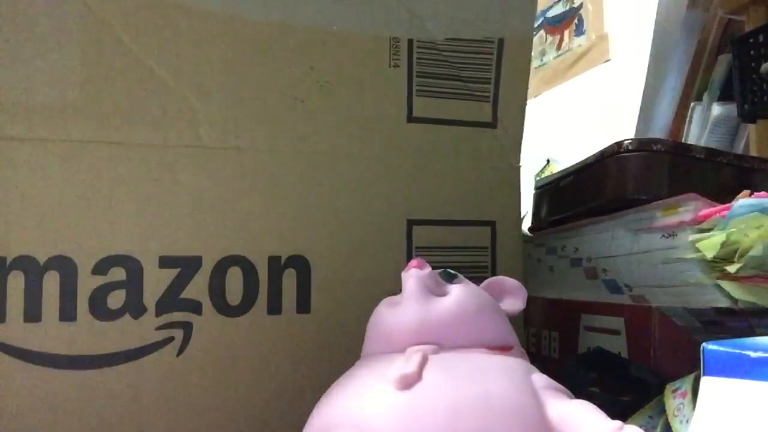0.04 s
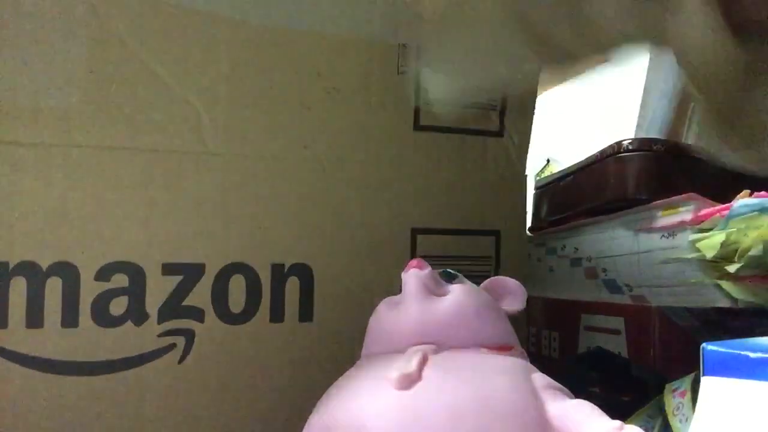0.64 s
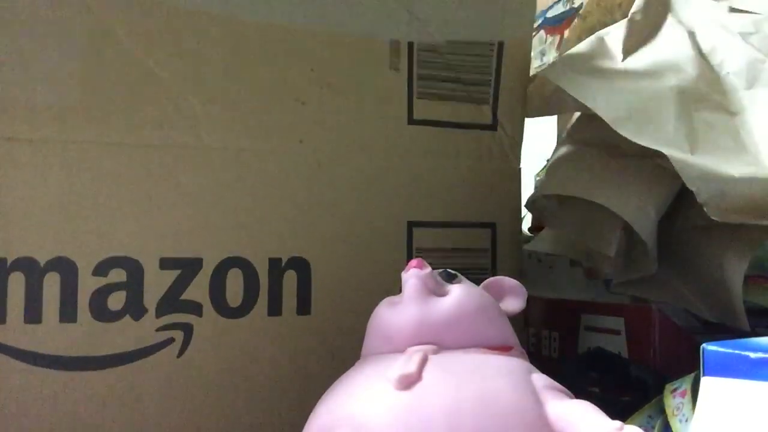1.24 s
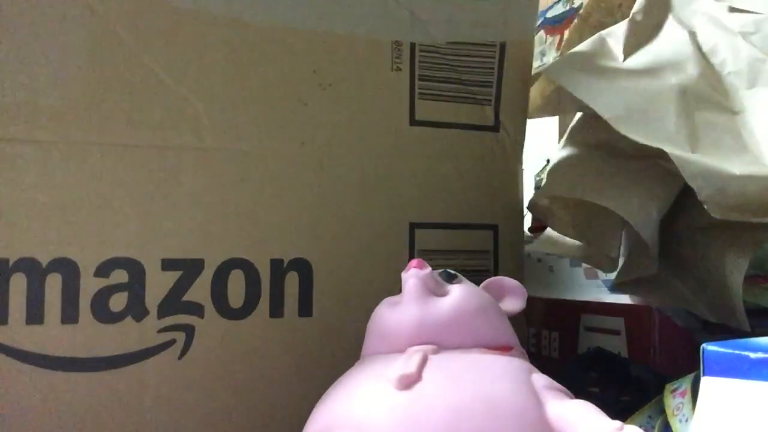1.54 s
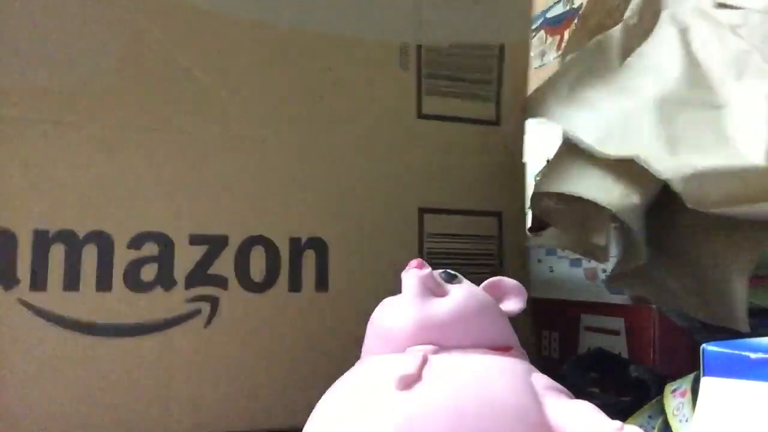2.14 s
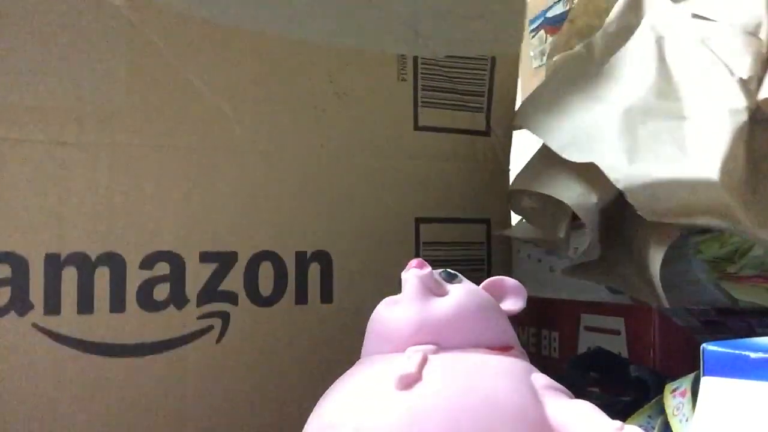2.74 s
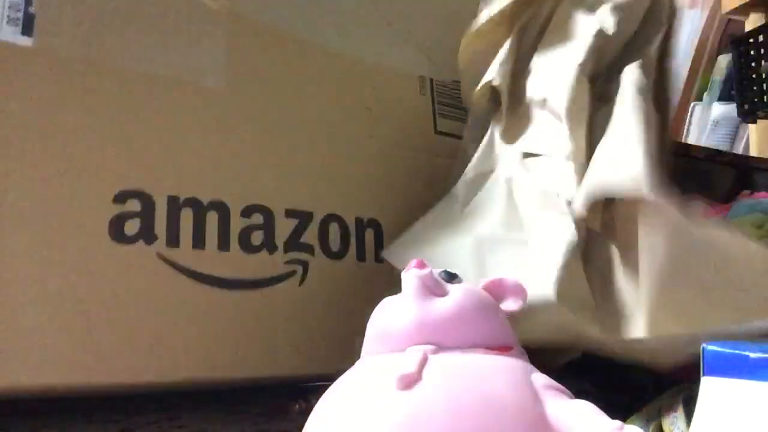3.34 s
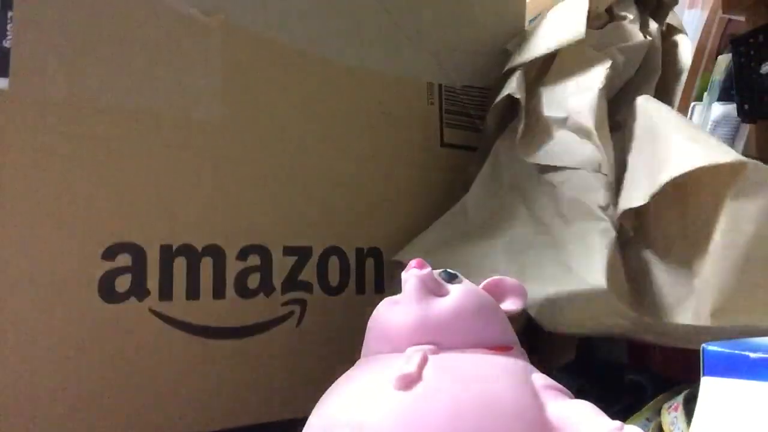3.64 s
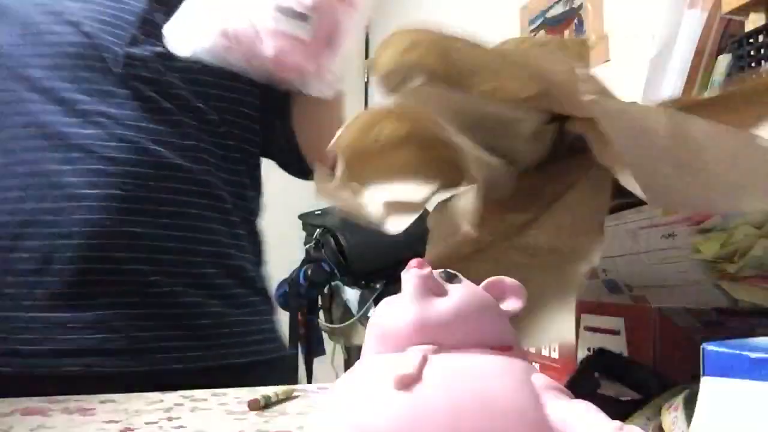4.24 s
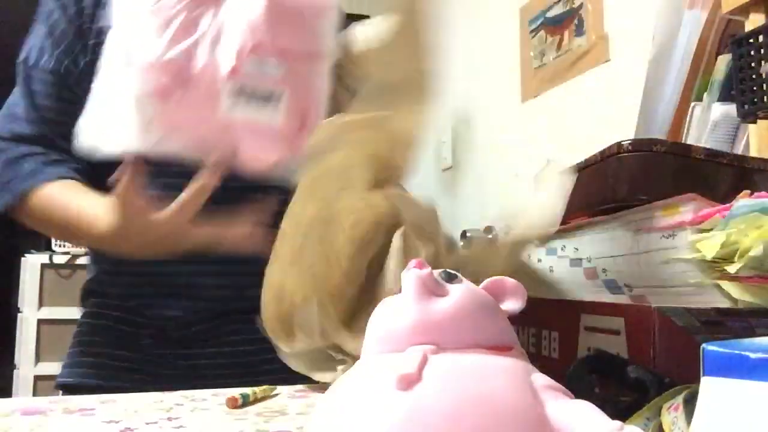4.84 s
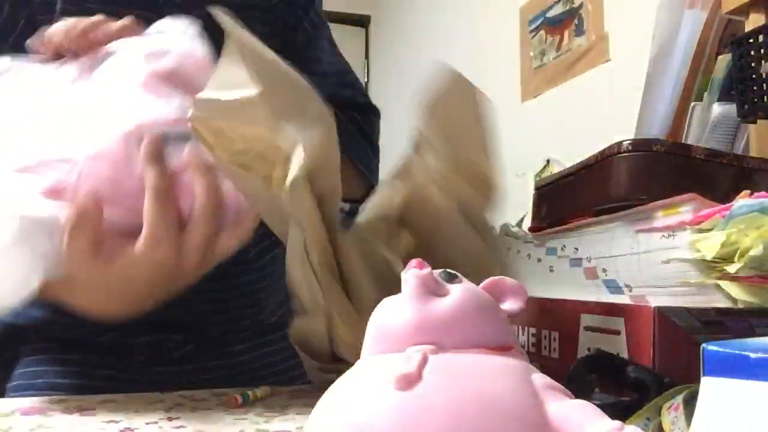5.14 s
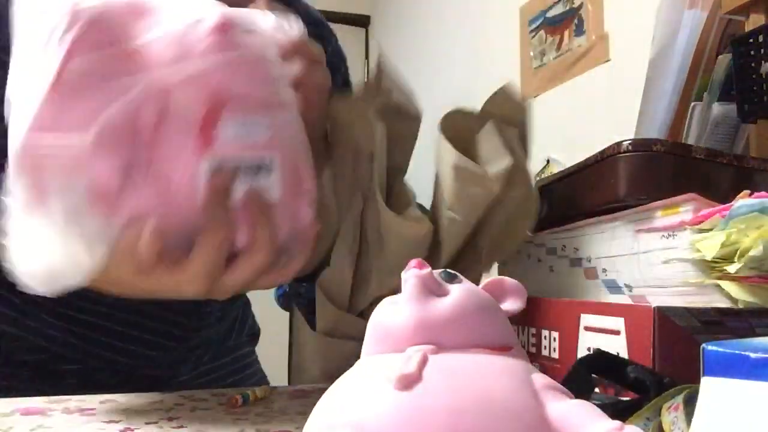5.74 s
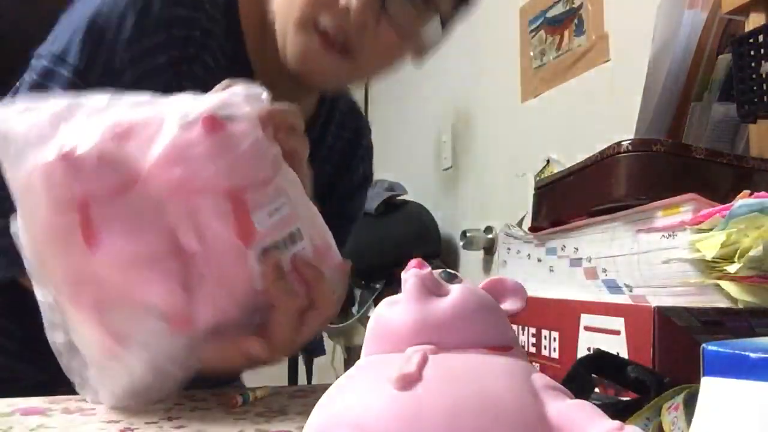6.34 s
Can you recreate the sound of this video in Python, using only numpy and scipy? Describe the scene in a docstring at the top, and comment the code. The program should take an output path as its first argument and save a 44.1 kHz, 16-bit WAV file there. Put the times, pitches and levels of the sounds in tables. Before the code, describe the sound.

Crumpled packing paper rustles close to the microphone in a small, quiet room, in uneven pulls full of bright crinkles and sharp snaps. It swells from about 0.4 to 0.9 seconds, pauses briefly, and resumes at 1.2. The cardboard box bumps hollowly as it is handled, loudest around 1.8 seconds, with lighter knocks and a few faint, very short squeaks near 2.2 to 2.5. Crackling and soft bumps continue until another loud cluster of box thuds at 3.7 and a sharp crack of its edge at 4. The rustle thins, then the paper whips taut with a loud flap at 4.7. Paper and a toy land on a desk in a quick run of dull thumps, fading by about 5.4. Dense, crisp crinkling builds from 5 to 6 seconds and eases off around 6.4, over a very faint room rumble.

```python
"""Crumpled packing paper rustles as it is dragged out of a cardboard box, close by in a small room.
Countless tiny creases buckle as the sheet slides, single folds snap, and the sheet flaps taut.
The box booms in its cavity and panel modes when bumped, squeaks by stick-slip friction and cracks
where an edge strikes. Then paper and a toy thump onto the desk, and the rustling goes on."""
import sys
import numpy as np
from scipy import signal
from scipy.fft import rfft, irfft
from scipy.io import wavfile
from scipy.ndimage import uniform_filter1d

SR = 44100
rng = np.random.default_rng(int(sys.argv[2]) if len(sys.argv) > 2 else 0)


def unload_audio(sound):
    """Save the sound as a 16-bit wav file, at the path given as the first command line argument."""
    columns = np.transpose(np.atleast_2d(sound))
    # keep every value between -1 and 1, then stretch to whole-number steps
    steps = np.round(np.clip(columns, -1, 1) * 32767)
    wavfile.write(sys.argv[1], SR, steps.astype(np.int16))


N = 282240
T = np.arange(N) / SR

# The bands into which clicks and echoes are divided. Each entry: a band edge in Hz.
BAND_EDGES_HZ = [60, 200, 450, 900, 1500, 2300, 3500, 5200, 7500, 10500, 14000, 18000]


def undb(db):
    """Decibels to amplitude ratio."""
    return 10 ** (np.asarray(db) / 20)


def unit(x):
    """Normalisation to an rms of 1."""
    return x / np.sqrt(np.mean(x ** 2))


def band(x, lo_hz, hi_hz, order=2):
    """Causal band-pass filtering."""
    sos = signal.butter(order, [lo_hz, min(hi_hz, .48 * SR)], "band", fs=SR, output="sos")
    return signal.sosfilt(sos, x + 1e-18)


def colour(x, points):
    """Spectral shaping through (Hz, dB) points, with a roll-off below the first."""
    hz, db = np.transpose(points)
    f = np.maximum(np.fft.rfftfreq(len(x), 1 / SR), 1)
    gain = undb(np.interp(np.log(f), np.log(hz), db))
    return irfft(rfft(x) * gain * np.minimum(f / hz[0], 1) ** 2, len(x))


def add(out, s, sound):
    """Superposition of a short sound, starting at s seconds."""
    i = max(int(s * SR), 0)
    out[i:i + len(sound)] += sound[:N - i]


def strokes():
    """Incoherent sources add in power: the hand's strokes give amplitudes of panels, creases and fizz."""
    # Each row: start, length and swell in seconds, level in dB, then the flexing of broad panels
    # and the fizz of fine creases in dB relative to that level.
    pulls = [(-0.01, 0.032, 0.00041, -44.5, -9, -8), (0.044, 0.069, 0.017, -51, -5.5, -17),
             (0.126, 0.12, 0.0055, -44, -8.5, -7.5), (0.284, 0.097, 0.071, -44, -8.5, -14),
             (0.389, 0.046, 0.0048, -36.5, -6.5, -4), (0.445, 0.23, 0.05, -34, -7.5, -6.5),
             (0.62, 0.21, 0.012, -39, -6.5, -3.5), (0.824, 0.076, 0.085, -42, -6.5, -1),
             (1.237, 0.15, 0.039, -48.5, -2, 6), (1.395, 0.27, 0.11, -49, -3.5, -2),
             (1.574, 0.075, 0.039, -48, 0.5, -1), (1.683, 0.41, 0.066, -46, 0, -0.5),
             (1.738, 0.043, 0.017, -48, 0, 7.5), (1.949, 0.24, 0.033, -42.5, -4.5, -3.5),
             (2.18, 0.27, 0.014, -49, -5, 0.5), (2.335, 0.045, 0.018, -48.5, 0.5, -9),
             (2.376, 0.18, 0.049, -42, -10.5, -2), (2.514, 0.12, 0.015, -40.5, -16, -0.5),
             (2.53, 0.033, 0.02, -44, -19, 2), (2.611, 0.25, 0.045, -41.5, -15, -2.5),
             (2.867, 0.18, 0.042, -45.5, -5.5, -2), (3.046, 0.5, 0.079, -40, -10.5, -1),
             (3.389, 0.11, 0.076, -40.5, -10.5, 1), (3.537, 0.18, 0.11, -40, -7.5, -2.5),
             (3.75, 0.065, 0.024, -53, -9, -4), (3.8, 0.14, 0.093, -39.5, -2.5, -3.5),
             (4.007, 0.35, 0.013, -51, -8.5, -4), (4.147, 0.052, 0.024, -47.5, -2.5, -15),
             (4.362, 0.14, 0.018, -55.5, -8, -8), (4.51, 0.17, 0.13, -55, -7, -4),
             (4.667, 0.19, 0.016, -46, 2, -6), (4.87, 0.15, 0.0062, -44, -7, -1),
             (5.012, 0.65, 0.084, -38.5, -10, -0.5), (5.255, 0.041, 0.044, -36.5, -6.5, 2),
             (5.502, 0.11, 0.077, -36.5, -9, 1), (5.63, 0.2, 0.025, -41, -11, -2),
             (5.849, 0.11, 0.065, -36.5, -9, 1), (5.94, 0.19, 0.092, -48, -10, -1),
             (6.147, 0.13, 0.13, -38.5, -8, -3), (6.306, 0.11, 0.035, -45.5, -10.5, -2.5)]
    easing_db_per_s, release_s = 3.5, 0.032
    power = np.full((3, N), undb(-74) ** 2)  # the sheet ticks faintly even when left alone
    t = T[:SR]
    for s, length_s, swell_s, db, flex_db, fizz_db in pulls:
        release = np.exp(-np.maximum(t - length_s, 0) / release_s)
        envelope = np.minimum(t / swell_s, 1) * undb(db - easing_db_per_s * t) * release
        for part, part_db in zip(power, (flex_db, 0, fizz_db)):
            add(part, s, (envelope * undb(part_db)) ** 2)
    return np.sqrt(power)


def buckles(per_s, spread_db, colour_db, bunch_db):
    """Buckling: creases give way at random, mostly small, a few large, each with its own spectrum."""
    bunching = unit(uniform_filter1d(rng.standard_normal(N), SR // 110))
    at = np.flatnonzero(rng.random(N) < per_s / SR)
    size_db = spread_db * np.minimum(rng.exponential(size=N)[at], 5.5) + bunch_db * bunching[at]
    chance, out = rng.standard_normal(N), 0
    for lo, hi in zip(BAND_EDGES_HZ, BAND_EDGES_HZ[1:]):
        polarity = np.sign(chance[at - hi - 1])  # the offsets give each band its own draws
        clicks = np.zeros(N)
        clicks[at] = polarity * undb(size_db + colour_db * chance[at - lo].clip(-2, 2))
        out = out + band(clicks, lo, hi)
    return out


def bending(x, depth_db, hold_s, span_hz):
    """Resonances depend on shape: each new fold shifts the colour of the sheet."""
    hz, s, bins = signal.stft(x, SR, nperseg=256)
    drift = rng.standard_normal(bins.shape)
    for axis, size in enumerate((span_hz / hz[1], hold_s / s[1])):
        for _ in range(2):
            drift = uniform_filter1d(drift, max(int(size), 1), axis=axis)
    gain = unit(undb(depth_db * unit(drift)))
    return signal.istft(bins * gain, SR)[1][:N]


def snaps(rows, fade_s, width, broad_db, facet_db):
    """Transient excitation: a brief burst, strongest near the pitch at which the freed facet rings."""
    out, t = np.zeros(N), T[:SR // 30]
    for s, db, hz in rows:
        burst = rng.standard_normal(len(t)) * np.exp(-t / fade_s)
        snap = band(burst, hz / (1 + width), hz * (1 + width), order=1)
        snap += undb(broad_db) * band(burst, 2000, 12000)
        snap += undb(facet_db) * band(burst, hz - 200, hz + 200, order=1)
        add(out, s, undb(db) * snap / np.abs(snap).max())
    return out


def crinkles(strength, per_s, above_db, spread_db, lo_hz=2200, hi_hz=11000):
    """Middling folds buckle one by one at random pitches, louder as the sheet is worked harder."""
    when, size, pitch = rng.random((int(per_s * N / SR), 3)).T
    stroke_db = 20 * np.log10(strength[(when * N).astype(int)])
    db = stroke_db + above_db + spread_db * np.minimum(-np.log(1 - size), 2)
    rows = zip(when * N / SR, db, lo_hz + (hi_hz - lo_hz) * pitch)
    return snaps(rows, fade_s=0.0014, width=0.45, broad_db=-9, facet_db=4)


def rustle():
    """Buckling over friction hiss: broad panels radiate the lows, fine creases the highs."""
    # The spectrum of the paper. Each row: frequency in Hz, relative level in dB.
    spectrum = [(55, -5), (160, 14), (210, 7.5), (345, 11), (490, -1.5), (630, 1), (950, -4), (1300, -5.5),
                (1700, -1.5), (2200, -8), (3100, -6), (7400, -5.5), (9000, 6.5), (12300, 12), (13900, 6.5),
                (15500, -19)]
    # The paper drumming on the box, less once the box is gone. Each row: time in seconds, gain in dB.
    coupling = [(0, 2.5), (.3, -9), (.5, 4), (.9, 2.5), (1.3, 2.5), (2.1, 0.5), (2.7, 3), (3.4, 3.5),
                (4.3, 2), (4.75, 2), (5.2, -2.5), (5.7, -5), (6.4, -8.5)]
    flex, crease, fizz = strokes()
    drumming = undb(np.interp(T, *np.transpose(coupling)))
    clicks = unit(buckles(per_s=5000, spread_db=2.3, colour_db=1.0, bunch_db=1.4))
    paper = colour(clicks + undb(-8) * rng.standard_normal(N), spectrum)
    lows, below_mid, below_top = (
        signal.sosfiltfilt(signal.butter(3, hz, fs=SR, output="sos"), paper) for hz in (450, 1900, 7500))
    parts = (lows, below_mid - lows, below_top - below_mid, paper - below_top)
    out = 0
    for part, gain in zip(parts, (flex * drumming, flex, crease, fizz)):
        # the hand feeds in energy steadily, so a big buckle leaves less for its neighbours
        running_rms = np.sqrt(uniform_filter1d(part ** 2, SR // 14) + 1e-18)
        out = out + gain * part / running_rms
    sheet = bending(out, depth_db=2.1, hold_s=0.035, span_hz=380)
    return sheet + crinkles(np.hypot(crease, fizz), per_s=40, above_db=8.5, spread_db=1.8)


def room_air():
    """Ambient noise: the faint, steady rumble of a still room."""
    # Each row: frequency in Hz, relative level in dB.
    spectrum = [(18, -30), (30, 4), (48, 20), (70, 3), (158, 11), (205, -2), (281, 8.5), (426, -16),
                (716, -1), (1060, -48), (2920, -10), (5030, -20), (15000, -54)]
    return undb(-60) * unit(colour(rng.standard_normal(N), spectrum))


def fold_snaps():
    """Snap-through: single folds release their elastic energy at once."""
    # Each row: start in seconds, peak level in dB, ring frequency in Hz.
    folds = [(0.1303, -34, 2770), (0.143, -27, 3400), (0.262, -30, 5170), (0.307, -28, 9000),
             (0.3075, -30.5, 2850), (0.4216, -19, 11400), (0.4513, -30, 6500), (0.4782, -26, 6500),
             (0.4952, -15, 4290), (0.512, -26, 8700), (0.635, -19.5, 8950), (0.6713, -15, 8900),
             (0.7606, -22, 3000), (0.8196, -19.5, 9270), (0.9544, -30, 7140), (1.0944, -49, 2950),
             (1.1355, -41.5, 3150), (1.137, -42, 12000), (1.2507, -31, 11100), (1.351, -25.5, 11100),
             (1.452, -32, 8700), (1.6185, -23.5, 10500), (1.626, -28, 2280), (1.749, -35, 10700),
             (2.2875, -22.5, 11300), (2.325, -33, 11000), (2.415, -28, 8950), (2.5228, -34, 11600),
             (2.7373, -38, 4210), (2.7718, -18.5, 9300), (2.8134, -23, 12600), (2.8369, -27, 10200),
             (2.919, -27.5, 2670), (3.0449, -24, 1810), (3.2267, -22, 8640), (3.2409, -22, 6000),
             (3.444, -29, 9900), (3.4869, -24, 9200), (3.9458, -28, 1700), (4.1105, -31, 9650),
             (4.1455, -39, 5450), (4.2145, -29, 9300), (4.338, -34, 8600), (4.394, -34, 12000),
             (4.516, -41, 4480), (4.5666, -31, 5560), (4.592, -35, 6500), (4.6175, -36, 3700),
             (4.9226, -24, 7900), (5.0718, -26, 10100), (5.2613, -26, 5300), (5.3015, -23, 11000),
             (5.3125, -17, 7000), (5.3535, -20, 9100), (5.5457, -22, 9600), (5.584, -15, 9700),
             (5.602, -21, 11300), (5.6515, -24, 8500), (5.6614, -18, 12000), (5.7323, -36, 5600),
             (5.8789, -31, 8700), (5.9707, -23, 9050), (6.1759, -25, 11400)]
    return snaps(folds, fade_s=0.0024, width=0.5, broad_db=-7, facet_db=2)


def flaps():
    """Sudden tension: a stretch of paper whips taut in a crackle that swells and dies exponentially."""
    # Each row: time of the crest in seconds, level in dB, swell and fade in seconds,
    # lower and upper cutoff in Hz.
    whips = [(0.131, -34, 0.00095, 0.012, 300, 9000), (0.394, -38, 0.0012, 0.0082, 305, 10900),
             (0.59, -29.5, 0.004, 0.025, 700, 5000), (0.637, -35, 0.0044, 0.006, 800, 6000),
             (0.676, -28, .004, 0.0046, 1300, 10200), (0.804, -39, 0.004, 0.0059, 500, 2500),
             (2.983, -33, 0.0032, 0.0089, 700, 5000), (3.723, -36.5, 0.032, 0.012, 500, 1840),
             (3.9706, -26, 0.00032, 0.018, 450, 3600), (4.147, -33.5, 0.00055, 0.0031, 400, 8900),
             (4.287, -41.5, 0.0051, 0.011, 200, 2220), (4.699, -17.5, 0.0043, 0.012, 980, 4800),
             (4.745, -30, 0.047, 0.013, 400, 1590), (4.781, -37.5, 0.012, 0.021, 450, 1600),
             (4.886, -23.5, 0.0057, 0.0092, 3000, 12300)]
    out, t = np.zeros(N), T[:SR // 3] - .04
    for s, db, swell_s, fade_s, lo_hz, hi_hz in whips:
        grit = rng.standard_normal(len(t)) * undb(2 * rng.standard_normal(len(t)))
        envelope = np.exp(np.minimum(t / swell_s, -t / fade_s))
        add(out, s + t[0], undb(db) * envelope * unit(band(grit, lo_hz, hi_hz, order=1)))
    return out


def impacts(blows, modes, reach_oct, scuff_db, scuff_s, contact_s, lag_rad, detune_oct):
    """Modal vibration: a blow rings the damped modes near its centre frequency, and the surfaces scuff."""
    out, t = np.zeros(N), T[:SR // 2]
    hz, mode_db, t60 = np.transpose(modes)[:, :, None]
    phase = lag_rad * np.arange(len(modes))[:, None]  # higher modes lag in phase
    for s, db, centre_hz, ring in blows:
        gain = undb(mode_db) / (1 + (np.log2(hz / centre_hz) / reach_oct) ** 2)
        # the load bends the panels and shifts their modes; the deepest keep their pitch
        bent_hz = hz * 2 ** (detune_oct * (hz > 175) * rng.standard_normal(hz.shape))
        decay = np.exp(-np.log(1000) * t / (t60 * ring))
        onset = 1 - np.exp(-t / (contact_s * ring ** 2))  # slower for a soft, loose contact
        body = (gain * np.sin(2 * np.pi * bent_hz * t - phase) * decay).sum(axis=0) * onset
        rubbing = unit(band(rng.standard_normal(len(t)), centre_hz * 0.5, centre_hz * 0.92))
        scuff = undb(scuff_db) * rubbing * np.exp(-t / (scuff_s * ring))
        add(out, s, undb(db) * (body / np.abs(body).max() + scuff))
    return out


def box_bumps():
    """Cavity and panel resonance: the box booms as it is bumped and moved away."""
    # Each row: start in seconds, level in dB, centre frequency in Hz, factor on the ring time.
    blows = [(0.403, -27, 257, 0.62), (0.472, -24.5, 310, 0.47), (1.28, -27.5, 197, 0.73),
             (1.399, -32.5, 288, 0.92), (1.733, -21.5, 192, 0.62), (1.830, -9.5, 350, 0.48),
             (1.840, -14, 217, 0.59), (1.866, -25, 115, 0.45), (1.908, -23, 300, 0.69),
             (2.017, -18.5, 210, 0.46), (2.088, -24, 242, 0.72), (2.18, -33.5, 110, 0.92),
             (2.229, -26.5, 273, 1.08), (2.252, -35.5, 298, 1.3), (2.288, -26.5, 142, 0.75),
             (2.449, -28.5, 376, 0.75), (2.9, -30.5, 257, 0.94), (3.021, -20.5, 156, 0.67),
             (3.035, -24.5, 156, 0.74), (3.145, -30, 640, 0.31), (3.165, -29.5, 167, 0.83),
             (3.701, -18, 252, 1), (3.714, -14.5, 332, 0.39), (3.722, -15, 220, 0.8),
             (3.732, -11.5, 255, 0.65), (3.753, -21, 209, 0.33), (3.816, -32, 546, 0.38),
             (3.856, -18, 92, 0.56), (3.88, -29, 148, 1.5), (3.9697, -19.5, 600, 0.57),
             (3.975, -22, 218, 0.51), (4.022, -29.5, 82, 0.71), (4.287, -32.5, 192, 0.47)]
    # Each row: mode frequency in Hz, relative level in dB, t60 in seconds at a ring factor of 1.
    modes = [(59, 1, 0.76), (79, -1, 0.55), (105.8, 8.5, 0.24), (155, 10.5, 0.3), (227, 1.5, 0.11),
             (255, 10.5, 0.11), (292, -4.5, 0.27), (351.4, 4, 0.19), (470, -21, 0.13), (630, 3.5, 0.076),
             (670, -3, 0.086), (840, 3, 0.098), (1250, 5, 0.052)]
    return impacts(blows, modes, reach_oct=0.65, scuff_db=-23, scuff_s=0.035,
                   contact_s=0.0049, lag_rad=0.49, detune_oct=0.035)


def squeaks(rough, grit_db, overtone_db=-10):
    """Stick-slip friction: cardboard slips at an uneven, falling rate, with gritty rubbing."""
    # Each row: start in seconds, level in dB, length in seconds, first and last slip rate in Hz.
    rubs = [(0.791, -35.5, 0.0166, 1340, 1000), (2.224, -37, 0.032, 997, 896),
            (2.24, -41.5, 0.035, 809, 657), (2.445, -33, 0.01, 620, 387)]
    out, t = np.zeros(N), T[:SR // 20]
    for s, db, length_s, first_hz, last_hz in rubs:
        along = np.minimum(t / length_s, 1)
        wobble, grip = unit(uniform_filter1d(rng.standard_normal((2, len(t))), SR // 900))
        slip_hz = (first_hz + (last_hz - first_hz) * along) * (1 + rough * wobble)
        phase = 2 * np.pi * np.cumsum(slip_hz) / SR
        slips = (np.sin(phase) + undb(overtone_db) * np.sin(2 * phase)) * unit(undb(3.0 * grip))
        grit = undb(grit_db) * unit(band(rng.standard_normal(len(t)), first_hz * 0.17, first_hz * 1.8))
        add(out, s, undb(db) * np.sin(np.pi * along) * (slips + grit))
    return out


def edge_cracks():
    """A short contact has a broad spectrum: a hard edge of the box strikes."""
    # Each row: start in seconds, peak level in dB, ring frequency in Hz.
    strikes = [(1.8302, -26, 600), (3.1445, -28, 900), (3.9702, -13.5, 2800), (3.9711, -14.5, 1200),
               (3.9725, -19, 480)]
    return snaps(strikes, fade_s=.0009, width=.7, broad_db=-17, facet_db=-6)


def desk_thumps():
    """Plate resonance: the desk top rings as paper and toy land on it."""
    # Each row: start in seconds, level in dB, centre frequency in Hz, factor on the ring time.
    landings = [(4.686, -19.5, 344, 1.2), (4.736, -11, 260, 1.12), (4.762, -22, 178, 0.7),
                (4.779, -18.5, 242, 0.89), (4.823, -18, 280, 1.12), (4.83, -18, 139, 0.65),
                (4.858, -26.5, 227, 1.4), (4.873, -22.5, 140, 0.84), (4.937, -21, 420, 0.63),
                (4.968, -26.5, 167, 0.68), (5.117, -27, 217, 0.41), (5.13, -24, 187, 1.01),
                (5.232, -38, 160, 0.88), (5.442, -32, 227, 1.2)]
    # Each row: mode frequency in Hz, relative level in dB, t60 in seconds at a ring factor of 1.
    modes = [(100, 6, 0.24), (155.2, 9, 0.28), (186, 5, 0.17), (248, 11, 0.057), (283.7, 4, 0.14),
             (366, -5.5, 0.12), (518, 0, 0.085), (643, 1.5, 0.11)]
    return impacts(landings, modes, reach_oct=0.45, scuff_db=-23, scuff_s=0.03,
                   contact_s=0.0045, lag_rad=0.4, detune_oct=0.02)


def tail(power, fade_s):
    """Exponential decay spreads each burst of power over time."""
    keep = np.exp(-2 / (fade_s * SR))
    return signal.lfilter([1 - keep], [1, -keep], power)


def room(x, wet_db, t60, near_db, near_s=0.017):
    """Diffuse reflection: quick scatter off the desk, then short reverberation from the walls."""
    out, hiss = x, rng.standard_normal(N)
    for lo, hi in zip(BAND_EDGES_HZ, BAND_EDGES_HZ[1:]):
        power = band(x, lo, hi) ** 2
        scatter = undb(near_db) ** 2 * tail(power, near_s)
        walls = undb(wet_db) ** 2 * tail(power, t60 / np.log(1000))
        out = out + np.sqrt(scatter + walls) * unit(band(np.roll(hiss, lo), lo, hi))
    return out / np.sqrt(1 + undb(near_db) ** 2 + undb(wet_db) ** 2)


def scene():
    """Superposition of paper, box and desk in the room, the same in both channels."""
    paper = room(fold_snaps() + rustle() + flaps(), wet_db=-14, t60=0.07, near_db=-4)
    contacts = edge_cracks() + box_bumps() + desk_thumps() + squeaks(rough=0.09, grit_db=-5)
    box_and_desk = room(contacts, wet_db=-27, t60=0.2, near_db=-19)
    return np.tile(paper + box_and_desk + room_air(), (2, 1))


def record(dry):
    """Band limiting removes the deepest bass and the highest treble."""
    lean = signal.sosfilt(signal.butter(5, 42, "high", fs=SR, output="sos"), dry)
    return signal.sosfilt(signal.ellip(8, .2, 70, 15600, fs=SR, output="sos"), lean)


dry = scene()
out = record(dry)
unload_audio(out)
```